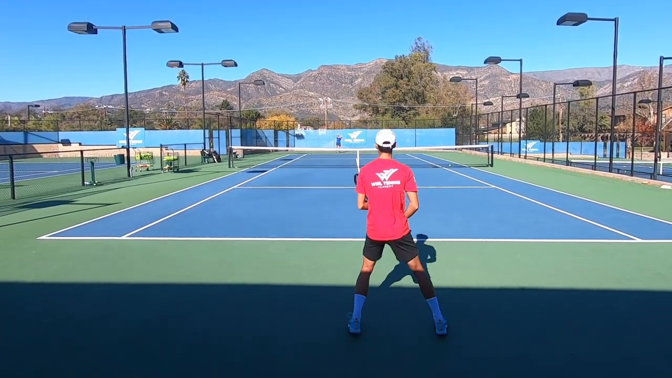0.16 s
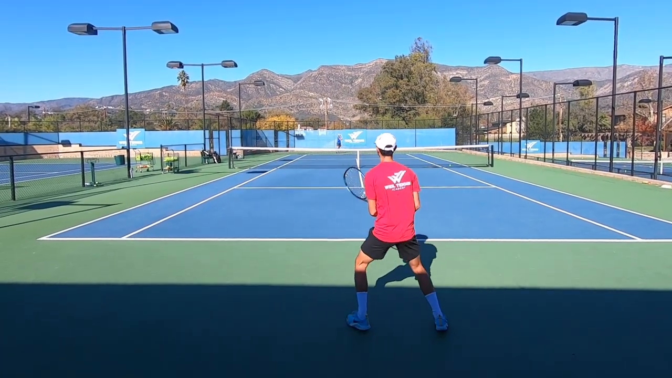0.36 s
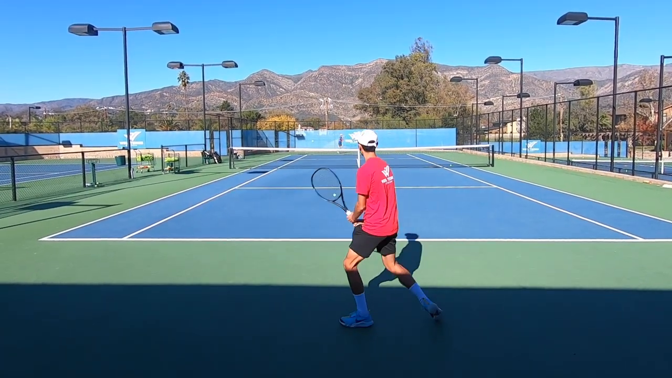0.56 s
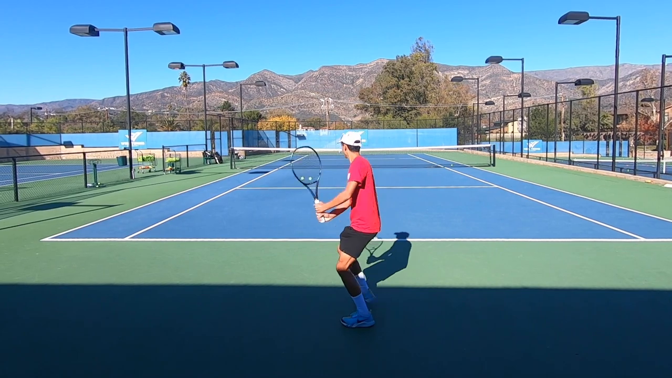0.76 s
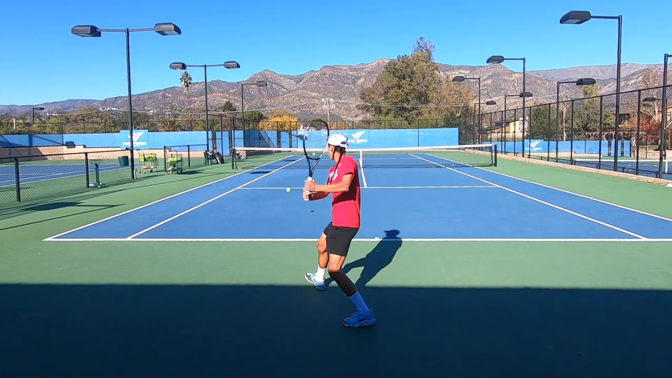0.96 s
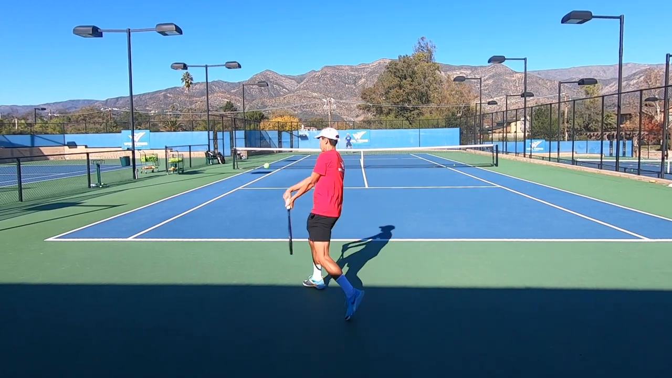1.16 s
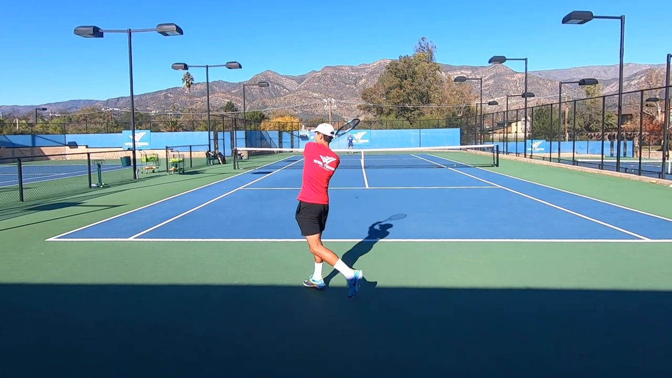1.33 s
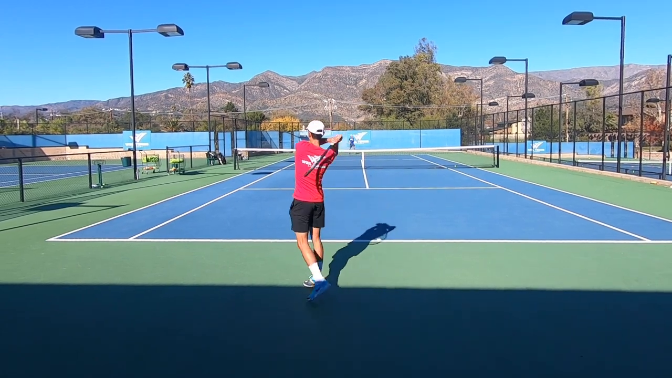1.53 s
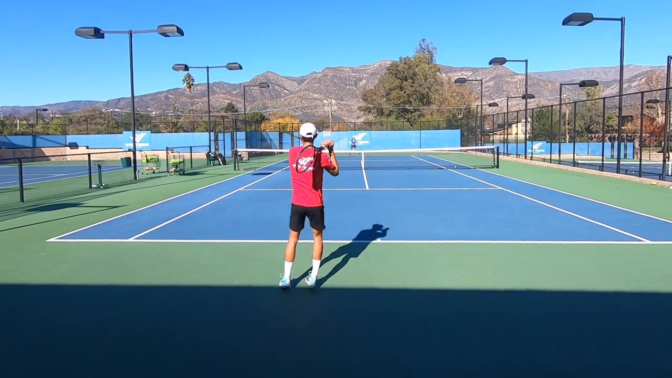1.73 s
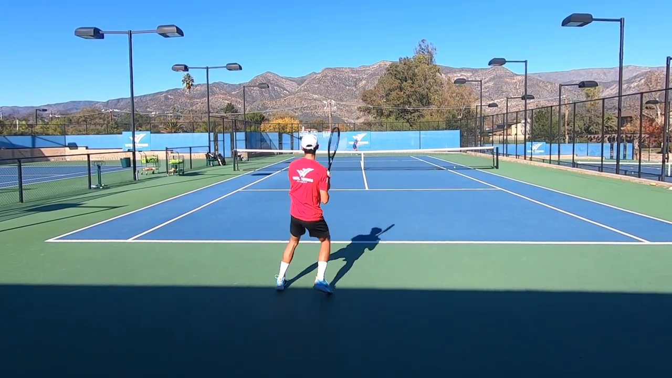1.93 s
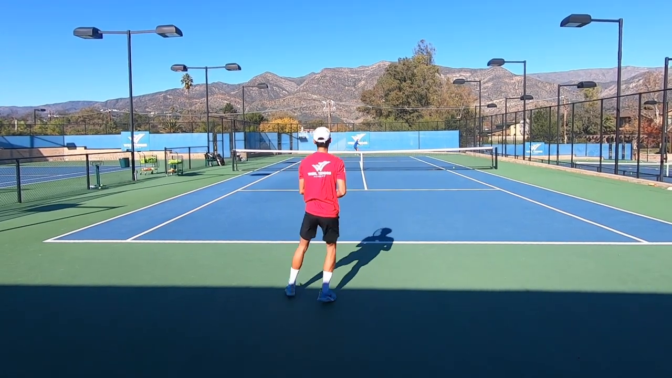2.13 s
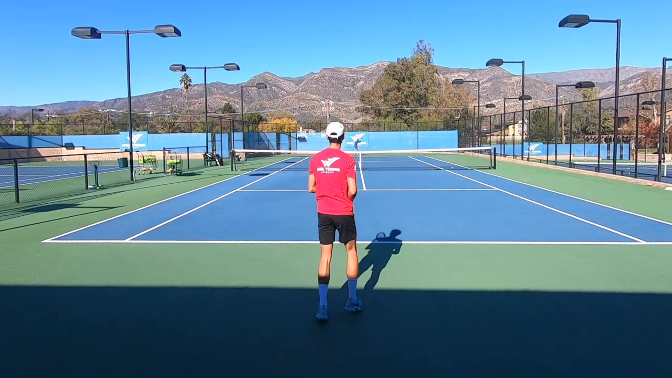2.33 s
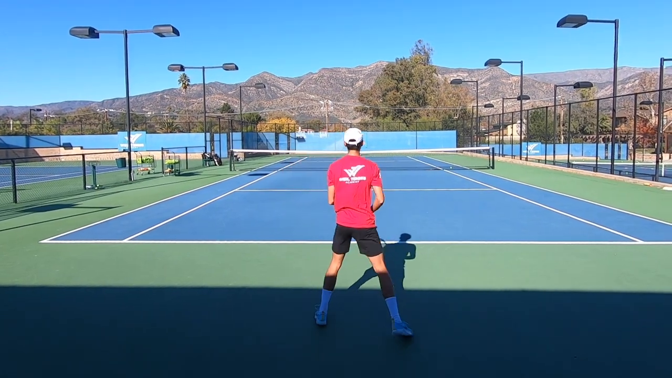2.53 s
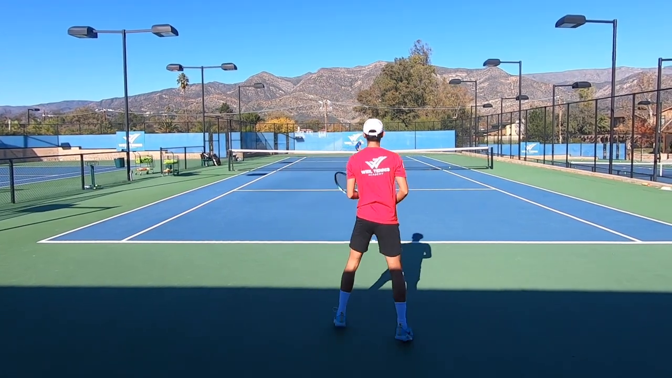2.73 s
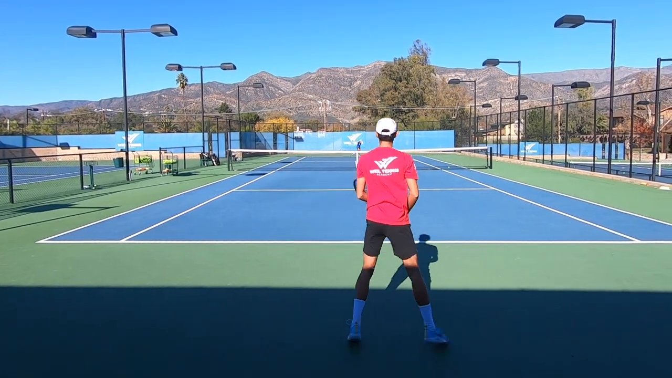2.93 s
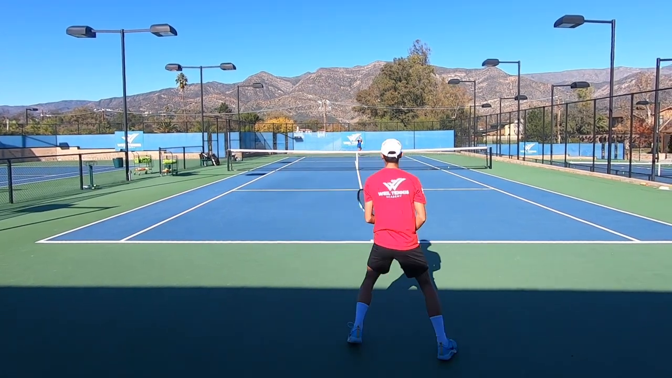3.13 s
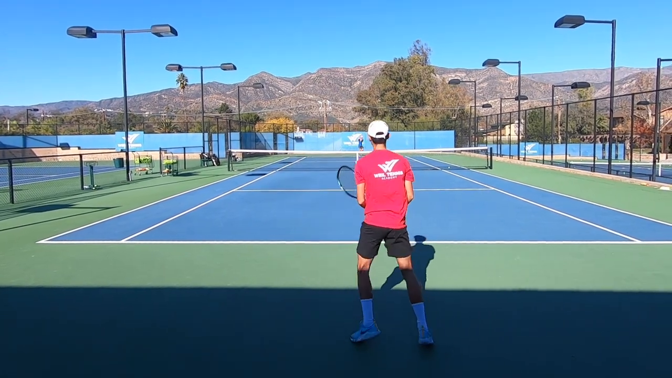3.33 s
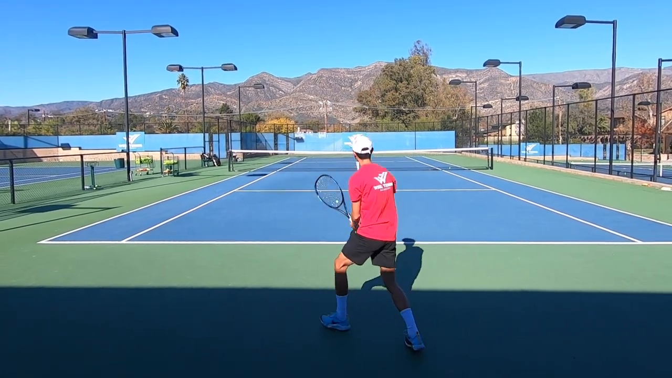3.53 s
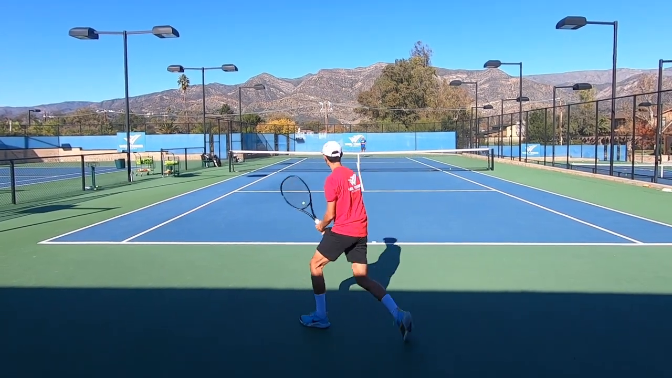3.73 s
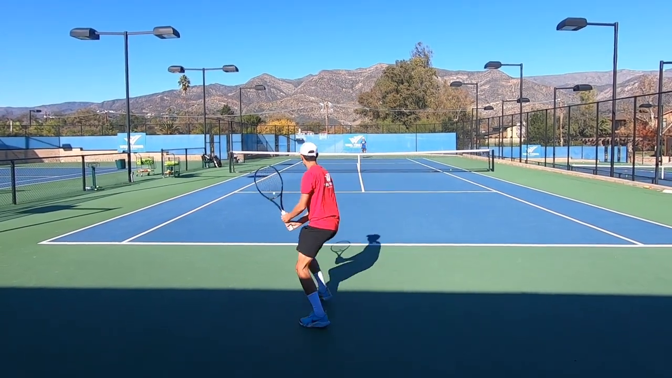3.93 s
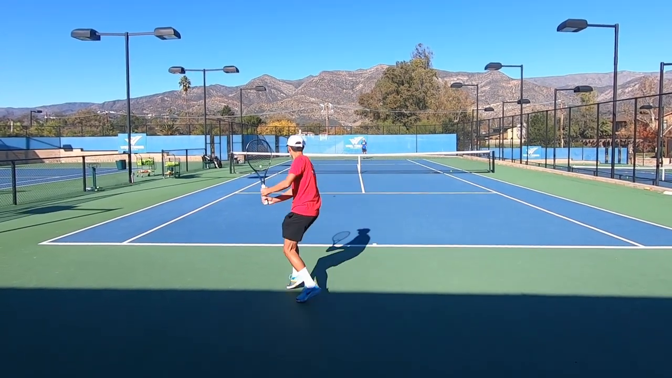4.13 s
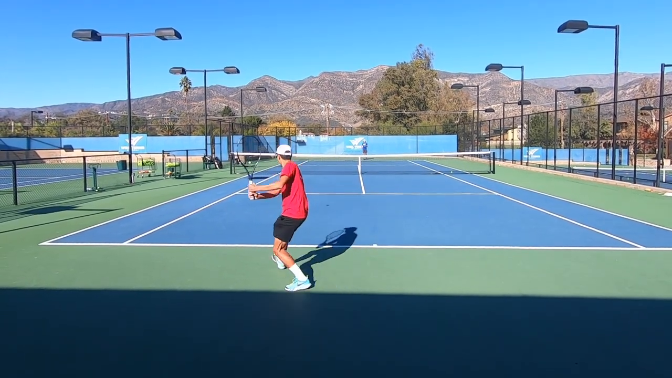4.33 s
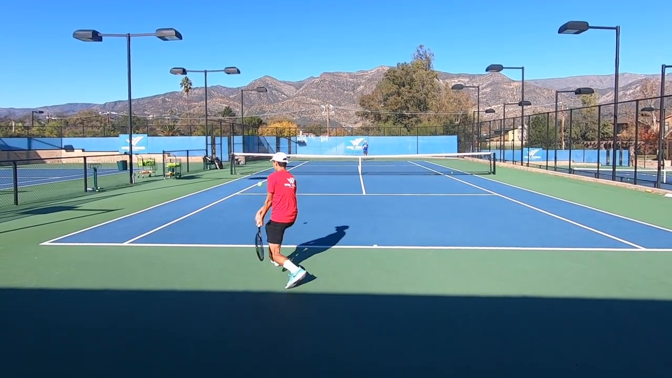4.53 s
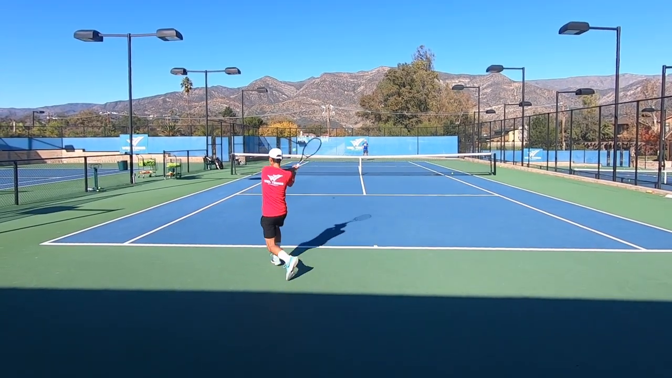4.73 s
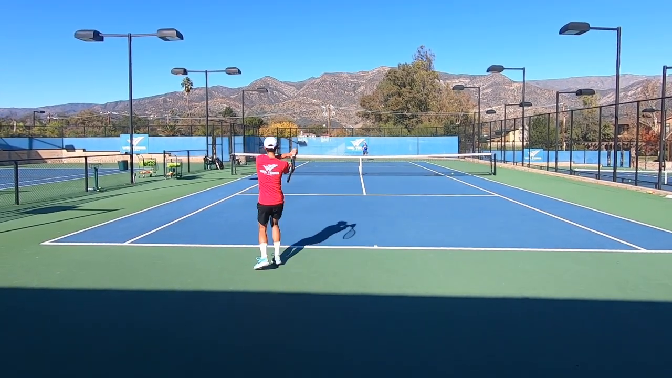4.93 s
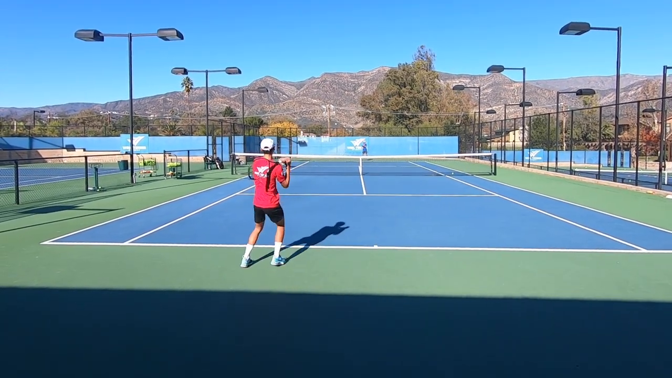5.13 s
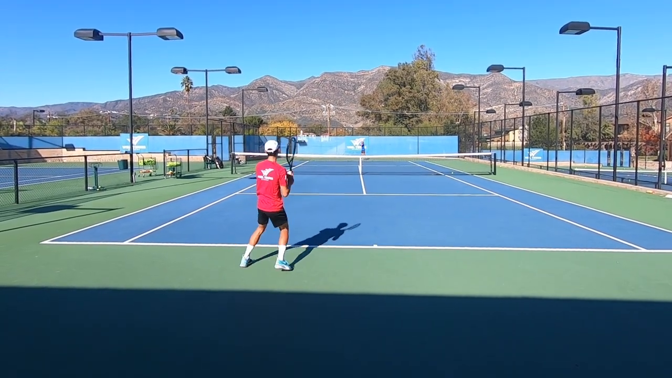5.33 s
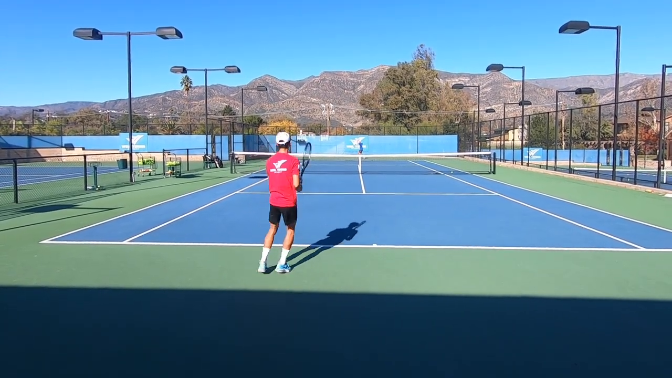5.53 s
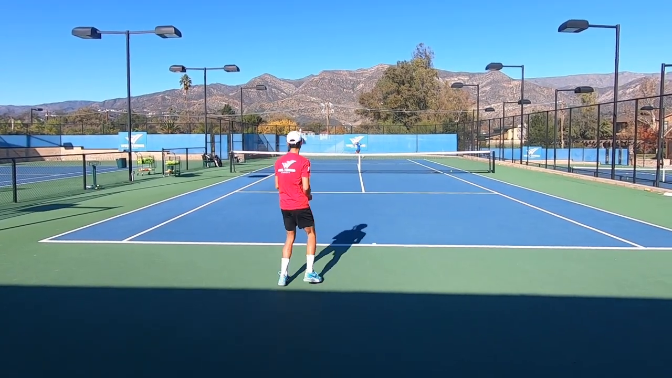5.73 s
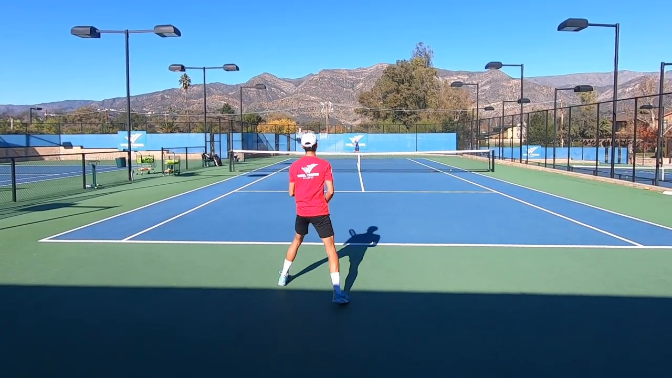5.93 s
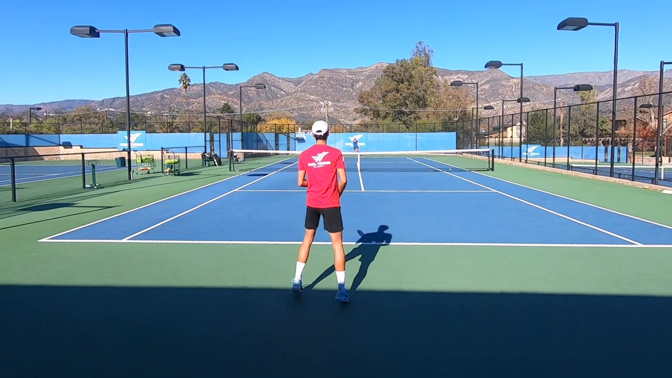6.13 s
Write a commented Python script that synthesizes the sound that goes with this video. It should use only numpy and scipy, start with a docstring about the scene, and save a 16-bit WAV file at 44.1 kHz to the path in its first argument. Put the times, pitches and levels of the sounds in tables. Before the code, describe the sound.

Tennis rally heard from behind a player: sharp hollow string hits, softer bounces, skidding soles, and faint distant traffic hum.

```python
"""Tennis balls pop on strings and ground at an outdoor hard court, a phone a few metres behind the near player:
each pop is a set of decaying sines plus a noise crack, with later slaps off fences and walls and a noise tail.
Soles scuff the gritty paint as uneven clicks in resonant bands, and the near racket swishes the same way.
Far off lie two faint whistles of narrow noise, traffic in half-octave noise bands, and a low hum of
two wavering tones over a deep rumble."""
import sys
import numpy as np
from scipy import signal
from scipy.fft import rfft, irfft, next_fast_len
from scipy.io import wavfile
from scipy.ndimage import uniform_filter1d

SR = 44100
rng = np.random.default_rng(int(sys.argv[2]) if len(sys.argv) > 2 else 0)


def master_out(mix):
    """Clip the mix to full scale and print it as 16-bit PCM to the path in sys.argv[1]."""
    frames = np.transpose(np.atleast_2d(mix))
    ceiling = np.clip(frames, -1, 1)
    pcm = np.round(ceiling * 32767).astype(np.int16)
    wavfile.write(sys.argv[1], SR, pcm)


N = 272008  # length [samples]
OPPOSITE = np.array([[1], [-1]])  # puts a side signal into left and right with opposite signs


def undb(db):
    """Amplitude factor of a level in dB."""
    return 10 ** (np.asarray(db) / 20)


def unit(x):
    """Scales to an RMS of 1."""
    return x / np.sqrt(np.mean(x ** 2))


def band(x, hz, width):
    """Band-pass, two poles a side, width in Hz."""
    center = np.sqrt(hz ** 2 + width ** 2 / 4)
    edges = [center - width / 2, center + width / 2]
    return signal.sosfilt(signal.butter(2, edges, "band", fs=SR, output="sos"), x)


def walk(rate, size=N):
    """Random levels, each held 1 / rate seconds, smoothed twice over that time; spread a little under 1."""
    hold = int(SR / rate)
    steps = np.repeat(rng.standard_normal(size // hold + 1), hold)
    return uniform_filter1d(uniform_filter1d(steps, hold), hold)[:size]


def sides(pan_db):
    """Left and right gains for a left-minus-right level in dB."""
    return undb(np.array([pan_db, -pan_db]) / 2)


def delayed(x, t, lag_s):
    """The same sound lag_s later, silent before."""
    return np.interp(t - lag_s, t, x, left=0)


# low hum and rumble under the court, levels joined by straight lines:
# (time [s], hum level [dB], octave level [dB], deep rumble level [dB])
HUM_LEVELS = [(0.0, -47, -47.5, -69), (0.27, -40, -60, -53), (0.38, -48.5, -50, -51),
              (0.93, -42.5, -57, -51.5), (1.36, -45.5, -44, -53), (1.46, -51.5, -68, -52),
              (1.7, -48.5, -53, -62), (1.94, -46, -60, -45), (2.03, -48, -53, -49.5), (2.39, -56, -55, -51),
              (2.54, -40.5, -57, -49), (3.01, -44, -49.5, -47), (3.13, -60, -65, -51),
              (3.43, -39.5, -49, -42), (3.88, -62, -54.5, -59), (3.98, -53.5, -66, -42),
              (4.26, -44, -46.5, -44.5), (4.52, -45, -55, -50.5), (5.62, -72.5, -55.5, -50.5),
              (5.72, -46, -56, -47), (5.87, -49, -51, -52), (6.17, -55.5, -62, -45)]
HUM_HZ, OCTAVE_HZ = 59.4, 118.4  # centres of the wavering pitches


def hum():
    """Two low tones wavering in pitch and level, and a deep noise rumble nearly alike at both microphones."""
    s, *columns = np.transpose(HUM_LEVELS)
    hum_db, octave_db, rumble_db = (np.interp(np.arange(N) / SR, s, c) for c in columns)
    tones = 0
    for hz, db in ((HUM_HZ, hum_db), (OCTAVE_HZ, octave_db)):
        phase = 2 * np.pi * hz * np.cumsum(1 + 0.0313 * walk(10)) / SR
        tone = np.sin(phase) * undb(3.1 * walk(17))
        tones = tones + undb(db) * unit(tone)
    mid, side = band(rng.standard_normal((2, N)), 32.2, 24)
    return tones + undb(rumble_db) * unit(mid + 0.21 * side * OPPOSITE)


# spectrum of the distant traffic: (frequency [Hz], relative level per Hz [dB])
TOWN_SPECTRUM = [(41, -30), (70, 2), (127, -7), (166, -12.5), (222, -11), (309, -16), (461, -25.5),
                 (702, -21), (1530, -27.5), (1670, -27.5), (5770, -52.5), (9600, -67.5), (14000, -81)]
TOWN_DB = -49.5  # RMS level of all the traffic


def town():
    """Distant traffic: half-octave noise bands swell together and flicker alone; wider towards the treble."""
    traffic, drift = 0, walk(1.0)
    spectrum_hz, spectrum_db = np.transpose(TOWN_SPECTRUM)
    for hz in 80 * 2 ** np.arange(0, 7.6, .5):
        mid, side = band(rng.standard_normal((2, N)), hz, hz / 2.6)
        db = np.interp(np.log(hz), np.log(spectrum_hz), spectrum_db) + 0.47 * drift + 4.2 * walk(7)
        width = np.clip(hz / 800, .2, .9)
        traffic = traffic + undb(db) * (mid + width * side * OPPOSITE)
    return undb(TOWN_DB) * unit(traffic)


# thin far whistles: (time [s], length [s], frequency [Hz], level [dB])
WHISTLES = [(4.925, .085, 3750, -64), (4.975, .085, 2660, -61)]


def whistles():
    """Faint, rough tones: noise in a narrow band, the same at both microphones."""
    t, tones = np.arange(N) / SR, 0
    for s, length, hz, db in WHISTLES:
        shape = np.sin(np.pi * np.clip((t - s) / length, 0, 1)) ** .5
        tones = tones + undb(db) * shape * unit(band(rng.standard_normal(N), hz, 0.012 * hz))
    return tones


# tail around the court: (frequency [Hz], relative level [dB], time to fall 60 dB [s])
TAIL = [(250, -6, 0.21), (515, -6, 0.77), (1030, 0, 0.97), (1860, 1, .8), (3660, 2, 0.69), (8050, 0, 0.58)]


def fences(feed):
    """Fences, lamp posts and walls return many small, patchy echoes, unrelated left and right."""
    size = 3 * SR // 2
    t = np.arange(size) / SR
    echoes = np.zeros((2, size))
    for side in echoes:
        patchy = undb(5.5 * walk(80, size=size))
        for hz, db, t60 in TAIL:
            noise = unit(band(rng.standard_normal(size), hz, 0.5 * hz))
            side += undb(db - 60 * t / t60) * patchy * noise
    echoes *= np.clip(t / 0.0042, 0, 1) * undb(-40)  # the nearest fence answers late
    echoes *= 1 + undb(3.5) * np.exp(-t / 0.026)  # close surfaces crowd the first moments
    return signal.fftconvolve(echoes, feed[None], axes=1)[:, :N]


# soles dragged on grit, near the phone: (time it bites [s], rise before that [s], hold [s], fall [s],
# top level [dB], duller part [dB over the level], finest grit [dB over the level])
SCUFFS = [(0.152, 0.0087, .002, 0.018, -45, 5.5, -32), (0.202, 0.016, .002, 0.027, -46, 4.5, -8),
          (0.29, .04, .01, .04, -72, 1, -17), (0.362, 0.037, 0.0018, .05, -64.5, 3, -23),
          (0.522, 0.0088, 0.011, 0.091, -62.5, 5.5, -23), (0.659, .01, .004, 0.056, -64, 2.5, -9),
          (1.053, 0.025, 0.0017, 0.029, -56.5, -3, -10), (1.234, 0.059, .002, 0.1, -60, 1.5, -6.5),
          (1.768, 0.18, .01, 0.022, -62.5, 2, -16), (1.792, 0.0064, .04, 0.029, -42.5, -4.5, -10),
          (2.058, 0.017, .002, 0.019, -49, -7, -26), (2.281, .008, 0.023, 0.14, -56, -2, -26.5),
          (2.376, 0.1, 0.0084, 0.035, -49, -13, -4.5), (2.59, 0.019, 0.02, 0.06, -55, 1.5, -0.5),
          (2.88, .02, .03, .012, -70.5, 7, -3), (3.363, 0.23, .009, 0.066, -63, 3.5, -7.5),
          (3.464, 0.049, 0.012, .013, -53, -9, -10), (3.54, 0.028, 0.0018, 0.04, -61, -4, -10.5),
          (3.723, 0.032, .008, 0.15, -65, 7, -15), (4.076, 0.0053, 0.035, 0.016, -39.5, 0.5, -7),
          (4.19, 0.0095, 0.0022, 0.022, -41, -5, -11), (4.256, .006, .002, 0.028, -62, -6, -4),
          (4.308, 0.059, .002, 0.03, -52.5, -0.5, -8), (4.48, 0.014, 0.0023, .019, -56.5, 1.5, -6),
          (5.071, 0.022, 0.067, 0.018, -44, -4, -8.5), (5.159, .01, .004, 0.076, -61, 2, -9),
          (5.399, .01, 0.0018, 0.056, -53, -12, -12), (5.666, 0.012, .064, 0.037, -47.5, -4.5, -9.5),
          (5.752, .004, .006, .015, -63, 11, -10.5), (5.956, 0.0055, 0.014, 0.039, -52.5, -3, -8)]
# the near racket cuts the air before it meets the ball, same columns
SWISHES = [(1.316, 0.045, 0.009, 0.0056, -42.5, -2.9, -8), (4.708, 0.053, 0.012, .003, -52.5, -0.017, -9)]
# resonances of sole and paint: (frequency [Hz], width [Hz], relative level [dB])
GRIT = [(4304, 2700, 1.6), (5814, 2160, 0.7)]
# resonances of the finest grit, same columns
FINE_GRIT = [(7900, 3400, 8), (11160, 1900, -9)]
EDGE_DB, PRESS_DB_PER_S = 29, 60  # drop at either end; growth while the sole holds
LIGHT_DULL, LIGHT_FINE = 0.22, .15  # dB gained by the dull and fine parts for each dB of that drop
SOLE_PAN_DB = 1  # left minus right


def grit_resonances(grit, modes):
    """Each resonance of sole and paint catches and slips on its own."""
    return unit(sum(undb(db + 3.5 * walk(70)) * band(grit, hz, width) for hz, width, db in modes))


def scuffs():
    """Dense grit clicks of uneven size under a sliding sole, duller in light contact; swishes reuse them."""
    t = np.arange(N) / SR
    clicks = rng.standard_normal((2, N)) * undb(3.2 * rng.exponential(size=N)) * undb(3.2 * walk(250))
    grit = clicks[0] + 0.24 * clicks[1] * OPPOSITE
    bright = grit_resonances(grit, GRIT)
    fine = grit_resonances(grit, FINE_GRIT)
    dull = unit(band(grit, 2630, 2090))
    out = np.zeros((2, N))
    for s, rise, hold, fall, db, dull_db, fine_db in SCUFFS + SWISHES:
        at = slice(int((s - rise) * SR), int((s + hold + fall) * SR))
        u = t[at] - s
        edge_db = EDGE_DB * np.maximum(np.maximum(-u / rise, (u - hold) / fall), 0)
        level_db = db - edge_db - PRESS_DB_PER_S * np.clip(hold - u, 0, hold)
        dull_part = undb(dull_db + LIGHT_DULL * edge_db) * dull[:, at]
        fine_part = undb(fine_db + LIGHT_FINE * edge_db) * fine[:, at]
        shape = undb(level_db) * signal.windows.tukey(len(u), .15)
        out[:, at] += shape * (bright[:, at] + dull_part + fine_part)
    return out * sides(SOLE_PAN_DB)[:, None]


def swell(t, time_s):
    """Grows to a top of 1 at time_s, as while the ball is squashed, then dies."""
    return (t / time_s * np.exp(1 - t / time_s)) ** 1.39


# ball on strings: (time [s], level [dB], thump [Hz], thump [dB], ring [Hz], low ring [dB], high ring [dB],
# crack [dB], left minus right [dB], tail feed [dB]); parts and feed in dB over the level
STROKES = [(0.005, -5.5, 233, -14.5, 1205, -10, -11, -45, 0, -8.5),
           (1.325, 3.5, 289, -13, 1010, -14, -15.5, -26.5, -1, -16),
           (2.956, -5, 257, -16.5, 1118, -12, -7.5, -52, -1, -12.5),
           (4.7157, 0.9, 223, -10.5, 1010, -13, -16.5, -24, 0, -14.5)]
# the strokes again, slapped back by fences and walls, same columns
SLAPS = [(0.026, -19, 350, -5.5, 1170, -19, -8, -38.5, -2, -10),
         (0.037, -23, 223, -8, 1040, -7, -16.5, -31, -2.5, -17),
         (0.093, -15, 348, -14, 1104, -5.5, -5, -37, 5.5, -15),
         (1.473, -19, 295, -9, 1180, -12, -21, -35, 1, -12),
         (1.513, -29, 294, -23, 1060, -11, -8, -41, 6, -10.5),
         (1.522, -14.5, 316, -17.5, 1020, -14, -12.5, -48, 2, -12.5),
         (2.979, -15.5, 250, -14, 997, -29, -4.5, -46, -3.5, -8.5),
         (2.995, -13.5, 194, -19, 985, -14, -31, -47, -1, -20),
         (3.056, -16.5, 394, -15, 1090, -9, -1, -27.5, 3.5, -12),
         (3.158, -30.5, 300, -32, 1155, -16, -9, -47, 5, -7.5),
         (3.268, -33.5, 300, -25, 1060, -9, -3, -45, 0, -1),
         (4.855, -23.5, 349, -7.5, 1080, -10, -11, -40, 2, -7.5),
         (4.898, -34, 290, -16, 1000, -20, -11, -42, -1, -10.5),
         (4.906, -13, 277, -14, 936, -15, -17, -54, 0.5, -7.5)]
# ball on the hard ground, same columns
BOUNCES = [(0.955, -16, 220, -7, 1206, -23, -7.5, -17, 2.5, -12.5),
           (1.12, -26, 268, -7, 910, -8.5, -18, -41, -0.5, -9),
           (3.694, -15.5, 310, -9.5, 1156, -16, -24, -50, -3.5, -1),
           (3.845, -22, 350, -12, 1024, -16, -14.5, -44, 0, 1),
           (3.977, -15.5, 227, -10.5, 1170, -25, -9.5, -37, 0, -12)]
# shoes landing on the court, same columns
FOOTFALLS = [(0.516, -38, 206, 1, 1010, -16, -24, -28, 0, -3.5),
             (2.184, -28.5, 207, -13.5, 1050, -19, -13.5, -26.5, 0.41, -23),
             (2.263, -40.5, 212, -7.5, 1240, -10, -3.5, -38.5, -1.5, -0.5),
             (2.585, -34, 230, -4.5, 1060, -12.5, -21, -25, -0.6, -24),
             (4.074, -19, 211, -10.5, 860, -17.5, -21.5, -34, -0.73, -6.5),
             (4.525, -26, 220, -9.5, 834, -8.5, -25, -44, 0, -28),
             (5.949, -31.5, 246, -5, 930, -11, -19.5, -47, -1.2, 0.5),
             (6.015, -28.5, 188, -10.5, 1240, -17, -12.5, -38, -0.26, -6)]
# each kind of blow: (rows, upper modes [dB], path via the ground [dB], treble sent to the tail [dB],
# decay of the knock sent there [s], crack time [s])
KINDS = [(STROKES, -20.5, -8.5, -3, 0.0072, 0.0016), (SLAPS, -20.5, -8.5, -7, 0.0057, 0.0013),
         (BOUNCES, -23.5, -9.5, -6.5, 0.0041, 0.00066), (FOOTFALLS, -18.5, -4.5, -13, 0.005, 0.001)]
# upper modes of ball and strings: (frequency [Hz], relative level [dB], swell and fade time [s])
UPPER = [(517, 1, 0.0025), (1444, -1, 0.0016), (1994, -6.5, 0.0018), (2583, -7.5, 0.0011),
         (2917, -7, 0.00071)]
# crack of felt and strings: (frequency [Hz], width [Hz], relative level [dB])
CRACK = [(2580, 4100, 4.5), (5170, 2030, 1), (7880, 3500, -5.5)]
THUMP_S, RING_S = 0.0026, 0.0018  # swell and fade times
RING_LATE_S, SQUASH_S, GROUND_LAG_S = .0007, 0.00147, 0.005218  # delays
LOW_RING = 0.756  # low ring as a share of the ring pitch
PUSH_HZ = 97  # shoved air


def pops():
    """Each blow rings the shell and the air inside; felt and strings crack. Returns direct sound and tail feed."""
    t = np.arange(SR // 10) / SR
    direct, feed = np.zeros((2, N + len(t))), np.zeros(N + len(t))
    snap = band(1. * (t == 0), 3300, 4200)
    for rows, upper_db, ground_db, snap_db, knock_s, crack_s in KINDS:
        felt = rng.standard_normal((len(rows), len(t)))
        cracks = sum(undb(db) * band(felt, hz, width) for hz, width, db in CRACK)
        for row, crack in zip(rows, cracks):
            s, db, thump_hz, thump_db, ring_hz, low_db, high_db, crack_db, pan_db, tail_db = row
            modes = [(LOW_RING * ring_hz, low_db, RING_S), (ring_hz, high_db, RING_S)]
            modes += [(hz, upper_db + over_db, time_s) for hz, over_db, time_s in UPPER]
            ring = sum(undb(g) * swell(t, time_s) * np.sin(2 * np.pi * hz * t) for hz, g, time_s in modes)
            ring = delayed(ring, t, RING_LATE_S)  # the higher modes wait for the ball to leave
            thump_swell = swell(t, THUMP_S)
            ring = ring + undb(thump_db) * thump_swell * np.sin(2 * np.pi * thump_hz * t)
            ring = delayed(ring, t, SQUASH_S)  # the felt cracks first, the shell rings once squashed
            push = undb(thump_db - 13.5) * thump_swell * np.sin(2 * np.pi * PUSH_HZ * t)
            blow = ring - push + undb(crack_db) * swell(t, crack_s) * unit(crack)
            via_ground = undb(ground_db) * delayed(blow, t, GROUND_LAG_S)
            blow = undb(db) * (blow + via_ground)
            i = int(s * SR)
            direct[:, i:i + len(t)] += sides(pan_db)[:, None] * blow
            # the surroundings hear the blow from all sides: a shorter, smoother knock
            knock = ring * np.exp(-t / knock_s) + undb(snap_db) * snap
            feed[i:i + len(t)] += undb(db + tail_db) * knock
    return direct[:, :N], feed[:N]


def scene():
    """Pops and scuffs with their shared tail, over the background."""
    direct, feed = pops()
    soles = scuffs()
    tail = fences(feed + undb(-19.5) * soles.mean(axis=0))
    return direct + soles + tail + whistles() + hum() + town()


# the phone's two microphone ports: (frequency [Hz], left minus right [dB], left leads by [radians])
PORTS = [(100, 0, 0.29), (700, -2.5, 0), (1310, -3, 0.58), (2400, -1, 0.88), (4250, -3.5, 0.35),
         (8040, -6, 1.63), (14000, -1.5, 1)]
MIC_ROLL_HZ, TOP_HZ = 12100, 16300  # treble 6 dB down; steep upper cut
CEILING = 0.99  # sample level that the rounded peaks approach


def record(dry):
    """The two microphone ports colour and turn the sound differently; the phone rounds peaks and cuts the top."""
    size = next_fast_len(N)
    hz, pan_db, turn = np.transpose(PORTS)
    bins_hz = np.arange(1, size // 2 + 2) * SR / size
    pan_db = np.interp(np.log(bins_hz), np.log(hz), pan_db)
    turn = np.interp(np.log(bins_hz), np.log(hz), turn)
    ports = sides(pan_db) * np.exp(.5j * np.array([turn, -turn]))
    ports = ports / (1 + (bins_hz / MIC_ROLL_HZ) ** 6)
    heard = irfft(rfft(dry, size) * ports, size)[:, :N]
    rounded = CEILING * np.tanh(heard / CEILING)
    return signal.sosfilt(signal.ellip(8, .2, 70, TOP_HZ, fs=SR, output="sos"), rounded)


dry = scene()
out = record(dry)
master_out(out)
```